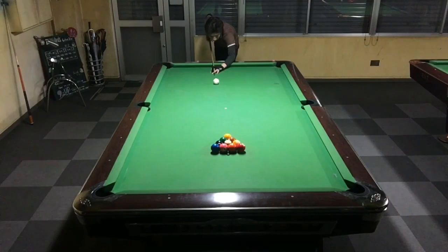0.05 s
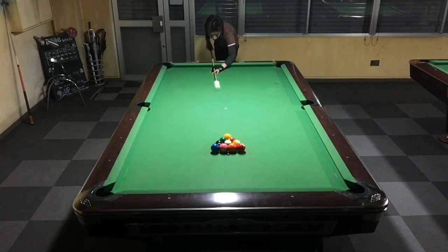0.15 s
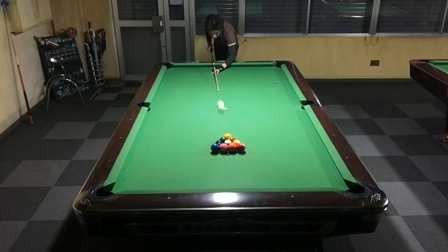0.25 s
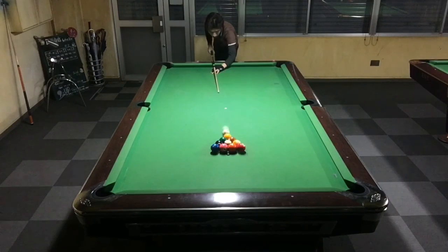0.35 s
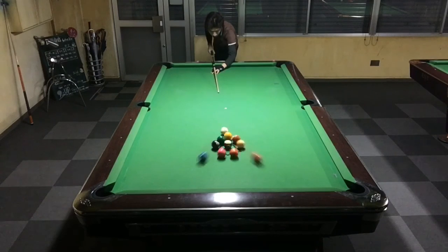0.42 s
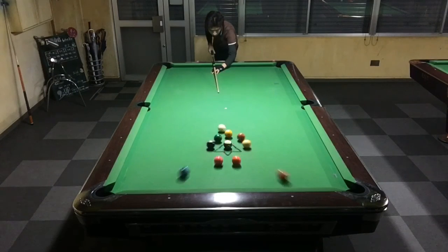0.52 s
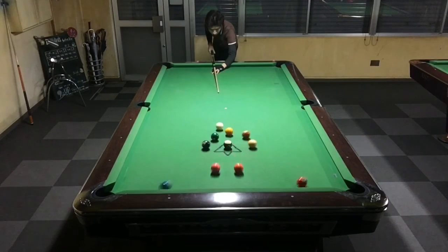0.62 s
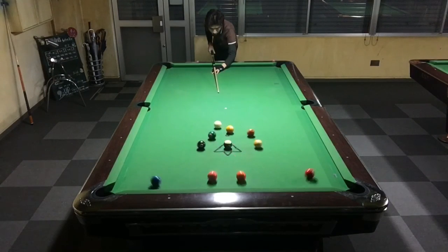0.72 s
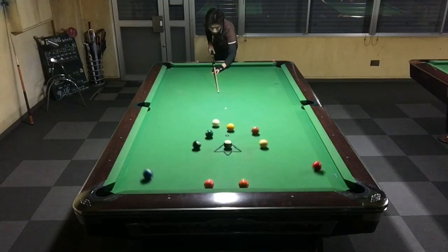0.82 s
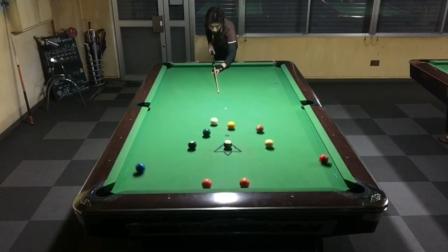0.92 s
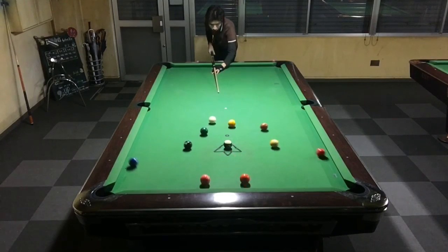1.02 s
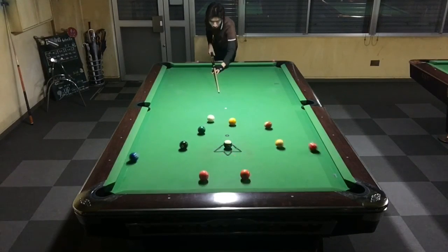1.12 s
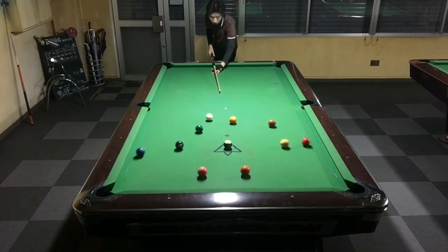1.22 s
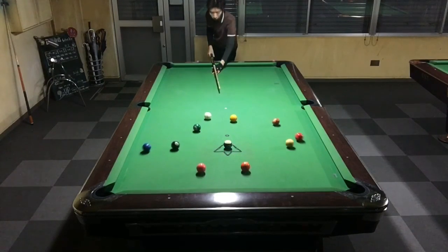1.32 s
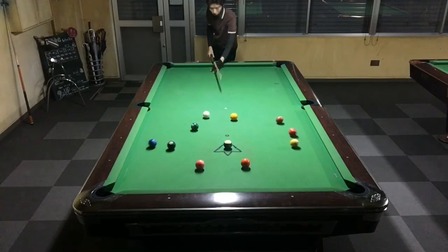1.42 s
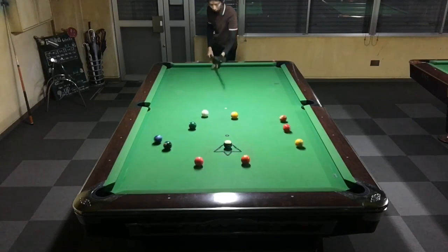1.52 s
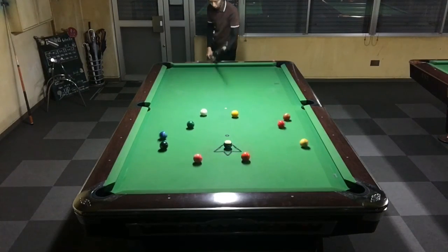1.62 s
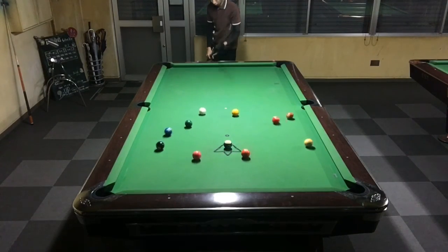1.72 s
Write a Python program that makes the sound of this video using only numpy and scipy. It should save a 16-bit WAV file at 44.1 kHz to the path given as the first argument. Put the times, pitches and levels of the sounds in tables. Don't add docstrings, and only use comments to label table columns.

```python
import sys
import numpy as np
from scipy import signal
from scipy.fft import rfft, irfft
from scipy.io import wavfile
from scipy.ndimage import uniform_filter1d, minimum_filter1d

SR = 44100
rng = np.random.default_rng(int(sys.argv[2]) if len(sys.argv) > 2 else 0)


def linear_from_db(decibels):
    return 10 ** (np.asarray(decibels, float) / 20)


def transcribe(u):
    v = np.clip(np.atleast_2d(u).T, -1, 1)
    q = np.round(v * 32767).astype(np.int16)
    wavfile.write(sys.argv[1], SR, q)


N = 79380
TIME = np.arange(N) / SR
PEAK = 256

# start_s, level_db, rise_s, t60_s
SPRAY_EVENTS = [
    (.2118, -50, .004, .33),
    (.4315, -46, .003, .35),
]


def rack():
    # start_s,
    # level_db
    clacks = [(.4326, 2.5), (.4347, -8.5), (.4365, -4), (.4393, -8.5), (.4414, -16), (.4428, -9.5),
              (.4453, -15.5), (.4465, -17), (.4516, -12.5), (.4537, -18), (.455, -10), (.4581, -10.5),
              (.4593, -6), (.4607, -2), (.4625, -8), (.4669, -14), (.472, -9.5), (.474, -5), (.479, -17.5),
              (.4085, -35),
        (.4905, -13),
        (.4965, -13),
        (.499, -12),
        (.5115, -16),
        (.535, -17),
        (.548, -18),
        (.569, -19),
    ]
    # pitch_hz, level_db
    ball_colour = [(300, -38), (900, -18.5), (1300, -7.5), (2000, -4), (2750, -3), (3600, -15),
                   (5000, -31.5), (12000, -76.5)]
    # pitch_hz, level_db, t60_s
    bed_modes = [(121, -47.5, 0.2), (191.2, -53, .4), (344.2, -46.5, 0.36), (410.5, -50, 0.28)]
    # start_s, pitch_hz, level_db, length_s
    packed_runs = [
        (.4553, 2600, -4, .0012),
        (.4592, 3100, -11.5, .0012),
        (.4462, 2700, -11, 0.00066),
    ]
    # pitch_hz, level_db
    spray_colour = [(3000, -21), (4500, -3), (6200, 7.5), (8000, -16), (11000, -11.5), (14500, -10.5),
                    (15800, -3.5)]
    hits = clicks(clacks)
    direct = -strike(hits, ball_colour) + ring(hits, bed_modes)
    far = linear_from_db(4) * hall(direct)
    return direct + bursts(packed_runs) + far + spray(SPRAY_EVENTS[1], spray_colour)


def cue():
    # start_s, level_db
    tip_hits = [
        (.2135, -12),
        (.2228, -22),
        (.2438, -24),
    ]
    # pitch_hz, level_db
    thump_colour = [(50, -47), (110, 0), (400, 2), (800, -1.5), (1500, -8), (2600, -7.5), (4500, -39),
                    (16000, -70)]
    # pitch_hz, level_db
    knock_colour = [(50, -40), (200, -13), (450, -1), (800, 0), (1500, -9), (2400, -18), (4000, -32),
                    (16000, -62)]
    # pitch_hz, level_db, t60_s
    shaft_modes = [(380, -2, .06), (1066, -3, 0.079), (1237, -10.5, .04), (2000, -2.5, 0.099),
                   (2126, -12, 0.047), (2570, -7, 0.096), (2860, 0.5, 0.03), (3200, -14, .05),
                   (3650, -6, 0.037), (4522, -23, .02), (5890, -21.5, .015)]
    # pitch_hz, level_db, t60_s
    butt_modes = [(405.3, -18.5, .25), (997, -25, 0.031), (5890, -43, 0.18)]
    # pitch_hz, level_db, t60_s
    stance_modes = [(91, -42, .15), (120, -53, .3), (185, -58.5, .1), (300, -52, .1)]
    # start_s, pitch_hz, level_db, length_s
    whip_glances = [
        (.2243, 2900, -30, .0014),
        (.2295, 1050, -29, .0016),
        (.2435, 2050, -31, .0012),
    ]
    # pitch_hz, level_db
    spray_colour = [(2000, -24.5), (4000, 0), (7000, -2.5), (10000, -20), (16000, -20.5)]
    shaft_db, shaft_near_db, shaft_lag_s = -22.5, -6, .009
    null_hz, null_q = 1745, 8
    hits = clicks(tip_hits)
    first_hit = clicks(tip_hits[:1])
    thump = -strike(hits, thump_colour)
    shaft = linear_from_db(shaft_db) * ring(first_hit, shaft_modes)
    far = hall(thump + shaft + ring(hits, stance_modes))
    far = signal.lfilter(*signal.iirnotch(null_hz, null_q, SR), far)
    near = linear_from_db(shaft_near_db) * np.roll(shaft, int(shaft_lag_s * SR))
    near = near - strike(hits, knock_colour) + ring(first_hit, butt_modes)
    return near + bursts(whip_glances) + linear_from_db(4.5) * far + spray(SPRAY_EVENTS[0], spray_colour)


def cushions():
    # start_s, level_db
    cushion_hits = [
        (.675, -40),
        (1.105, -50),
    ]
    # pitch_hz, level_db, t60_s
    rail_modes = [(119.3, -7.5, 0.37), (182.6, -1, 0.23), (224.4, -4, .15), (705, -3, 0.1)]
    soft = np.hanning(45)
    contacts = convolve(clicks(cushion_hits), soft / soft.sum())
    thuds = ring(contacts, rail_modes)
    return signal.sosfilt(signal.butter(2, 90, "high", fs=SR, output="sos"), thuds)


def clicks(rows):
    out = np.zeros(N)
    for start_s, level_db in rows:
        out[int(start_s * SR)] += linear_from_db(level_db)
    return out


def strike(hits, colour):
    return convolve(np.roll(hits, -PEAK), pulse(colour))


def pulse(colour, size=4096):
    phase_share = .35
    hz = np.maximum(np.arange(size // 2 + 1), 1) * SR / size
    log_gain = np.log(linear_from_db(at_hz(colour, hz)))
    cepstrum = irfft(log_gain, size)
    cepstrum[size // 2 + 1:] = 0
    phase = 2 * phase_share * rfft(cepstrum).imag
    shape = irfft(np.exp(log_gain + 1j * phase), size)
    shape = np.roll(shape, PEAK - np.argmax(np.abs(shape)))
    shape[:PEAK] *= np.hanning(2 * PEAK)[:PEAK]
    return shape[:size // 2] / np.abs(shape).max()


def ring(force, modes):
    out = 0
    for pitch_hz, level_db, t60_s in modes:
        radius = linear_from_db(-60 / (t60_s * SR))
        angle = 2 * np.pi * pitch_hz / SR
        poles = [1, -2 * radius * np.cos(angle), radius * radius]
        out = out + linear_from_db(level_db) * signal.lfilter([0, np.sin(angle)], poles, force + 1e-18)
    return out


def bursts(rows):
    out = 0
    for start_s, pitch_hz, level_db, length_s in rows:
        age = TIME - start_s
        swell = np.exp(-.5 * (age / length_s) ** 2)
        out = out + linear_from_db(level_db) * swell * np.sin(2 * np.pi * pitch_hz * age)
    return out


def spray(event, colour):
    start_s, level_db, rise_s, t60_s = event
    age = np.maximum(TIME - start_s, 0)
    noise = coloured_noise([(10, -92)] + colour)
    dull = signal.sosfilt(signal.butter(2, 7000, fs=SR, output="sos"), noise)
    bright = noise - dull
    fading = dull * linear_from_db(-60 * age / t60_s) + bright * linear_from_db(-60 * age / (0.65 * t60_s))
    return linear_from_db(level_db) * (1 - np.exp(-age / rise_s)) * fading


def hall(x):
    # pitch_hz, t60_s
    hall_decay = [(60, 4.7), (250, 2.4), (600, 1.49), (1400, 1.134), (2500, 0.94), (3600, 0.78),
                  (5500, 0.59), (16000, .25)]
    build_s, patchy_db = 0.0055, 1
    early_db, early_s = 3, .04
    white = rng.standard_normal((2, N))
    edges = 40 * 2 ** np.arange(0, 9, 1 / 3)
    answer = 0
    for k, (low, high) in enumerate(zip(edges, edges[1:])):
        bandpass = signal.butter(2, [low, high], "band", fs=SR, output="sos")
        band = signal.sosfilt(bandpass, white[k % 2])
        patches = np.interp(TIME, np.arange(60) / 30, rng.standard_normal(60))
        t60_s = at_hz(hall_decay, np.sqrt(low * high))
        answer = answer + band * linear_from_db(-60 * TIME / t60_s + patchy_db * patches)
    early_lift = linear_from_db(early_db * np.exp(-TIME / early_s))
    build_up = 1 - np.exp(-TIME / build_s)
    return convolve(x, answer * early_lift * build_up / np.sqrt(.1 * SR))


def air():
    # pitch_hz, level_db per Hz
    air_colour = [(15, -45), (25, -17), (59, 0), (141, -16.5), (180, 1), (309, -14), (624, -16),
                  (1040, -21), (16000, -49)]
    air_db, hum_db, hum_hz, hum_width_hz = -64, -63.5, 219, 88
    hum_shape = 1 / (1 + ((spectrum_hz() - hum_hz) / hum_width_hz) ** 4)
    hum = irfft(rfft(rng.standard_normal(N)) * hum_shape, N)
    return linear_from_db(air_db) * coloured_noise(air_colour) + linear_from_db(hum_db) * rms_one(hum)


def coloured_noise(colour):
    return rms_one(irfft(rfft(rng.standard_normal(N)) * linear_from_db(at_hz(colour, spectrum_hz())), N))


def spectrum_hz():
    return np.maximum(np.arange(N // 2 + 1) * SR / N, 10)


def rms_one(x):
    return x / np.sqrt(np.mean(x ** 2) + 1e-20)


def at_hz(points, hz):
    table_hz, value = np.transpose(points)
    return np.interp(np.log(hz), np.log(table_hz), value)


def convolve(x, h):
    return signal.fftconvolve(x, h)[:N]


def scene():
    return (rack() + cue() + cushions() + air())[None]


def roll_off(x):
    return signal.sosfilt(signal.butter(12, 16430, fs=SR, output="sos"), x)


def record(dry):
    # start_s, level_db
    limiter_gain = [
        (.43, 4),
        (.47, -0.5),
        (.6, -3),
        (.7, 2),
        (.94, 2.5),
    ]
    # start_s, end_s
    step_span = (.44, .938)
    hiss_db, hiss_grows_db = -70, 8.5
    ceiling, smooth_s = .7, .003
    start_s, level_db = np.transpose(limiter_gain)
    limited = dry * linear_from_db(np.interp(TIME, start_s, level_db))

    hiss_band = signal.butter(1, [3000, 11000], "band", fs=SR, output="sos")
    hiss = signal.sosfilt(hiss_band, rng.standard_normal(N))
    hiss_gain = linear_from_db(hiss_db + hiss_grows_db * (TIME - step_span[1]) * 2)
    stepping = (TIME > step_span[0]) * (TIME < step_span[1])
    x = limited + hiss_gain * hiss * stepping

    span = int(smooth_s * SR)
    room = minimum_filter1d(ceiling / np.maximum(np.abs(x), ceiling), span)
    x = x * uniform_filter1d(uniform_filter1d(room, span // 2), span // 2)
    x = signal.sosfilt(signal.cheby2(12, 60, 16400, fs=SR, output="sos"), x)
    return roll_off(x)


dry = scene()
out = record(dry)
transcribe(out)
```